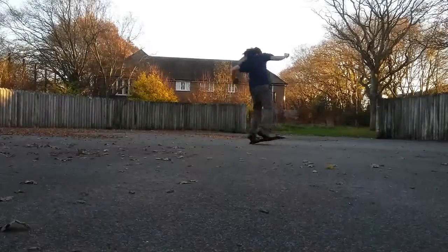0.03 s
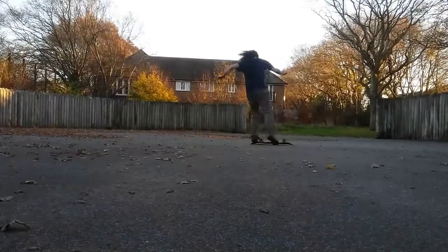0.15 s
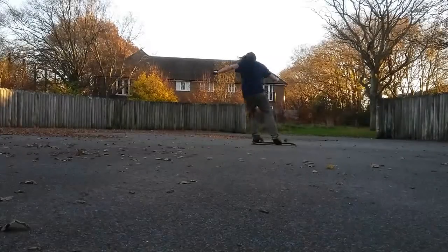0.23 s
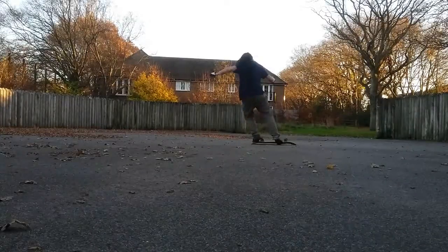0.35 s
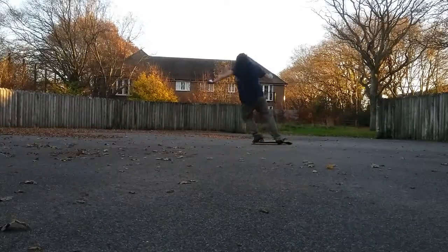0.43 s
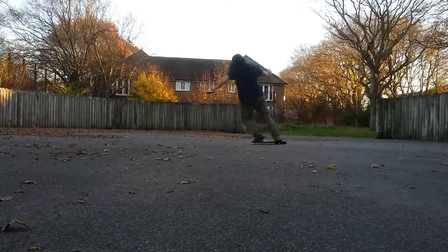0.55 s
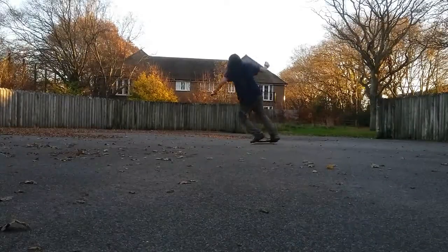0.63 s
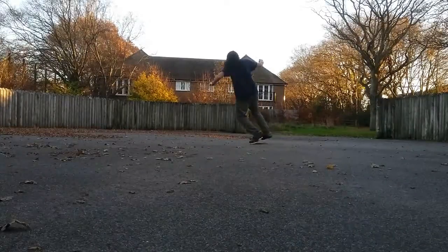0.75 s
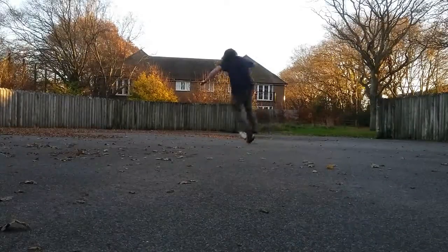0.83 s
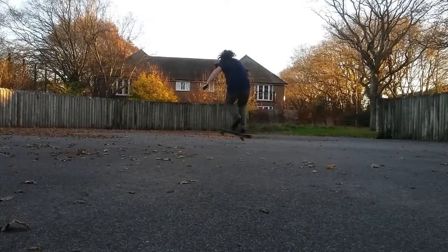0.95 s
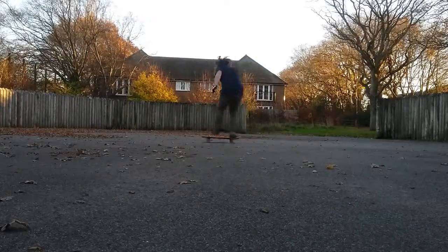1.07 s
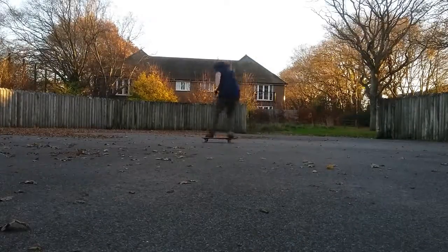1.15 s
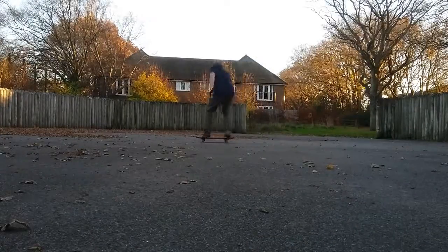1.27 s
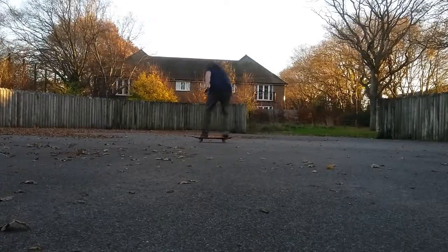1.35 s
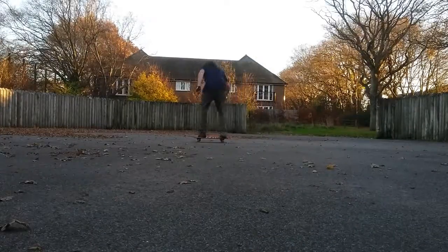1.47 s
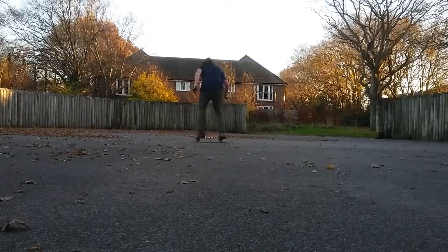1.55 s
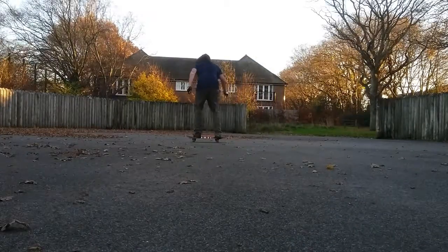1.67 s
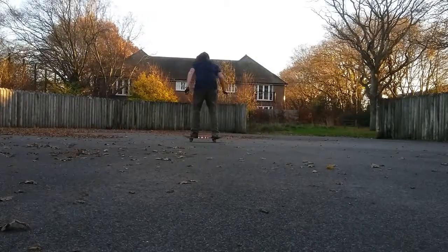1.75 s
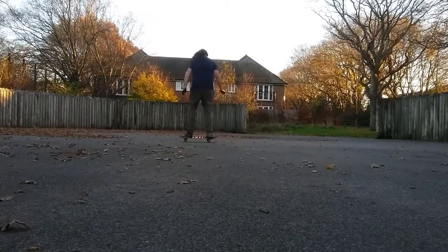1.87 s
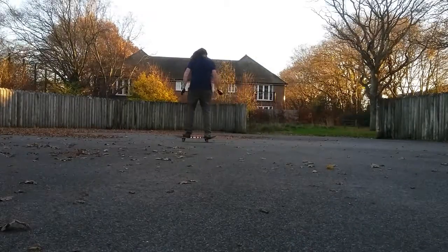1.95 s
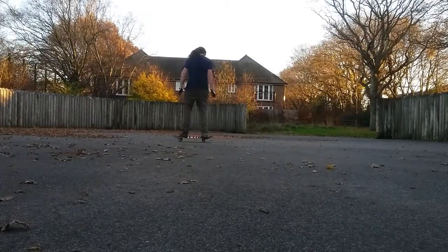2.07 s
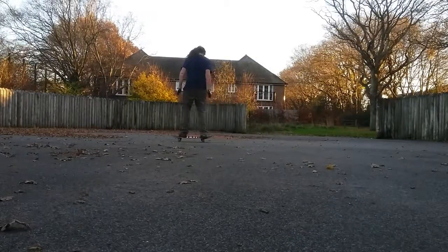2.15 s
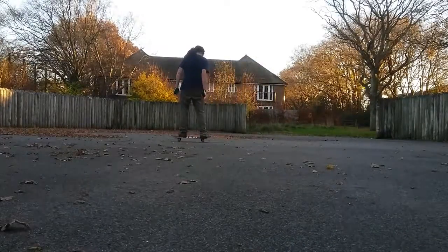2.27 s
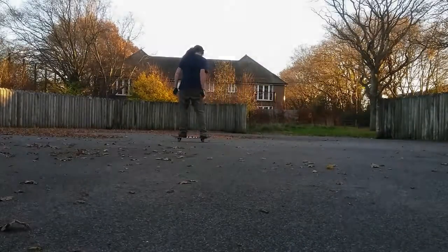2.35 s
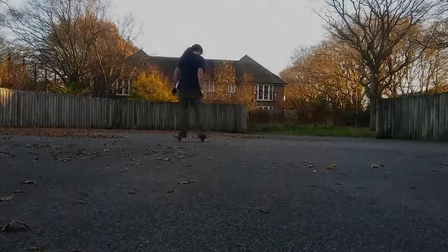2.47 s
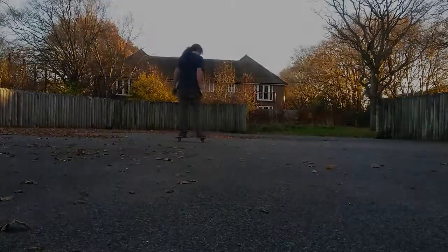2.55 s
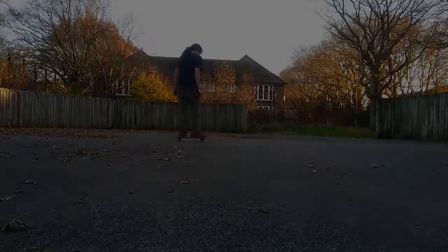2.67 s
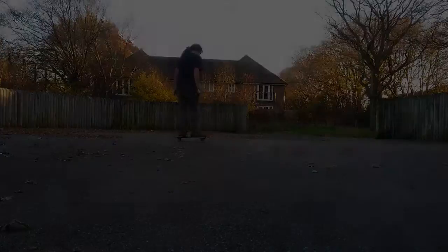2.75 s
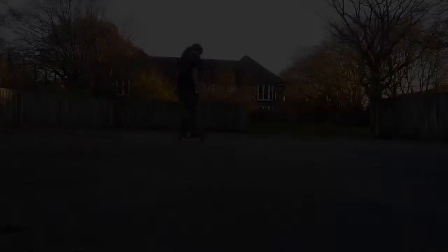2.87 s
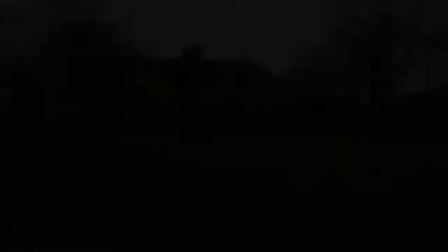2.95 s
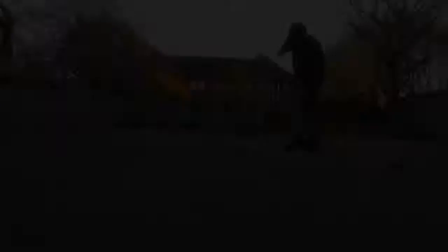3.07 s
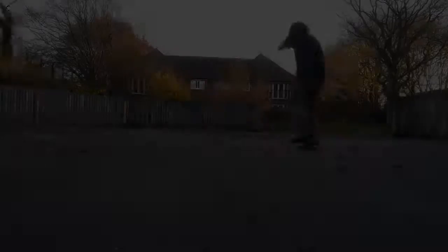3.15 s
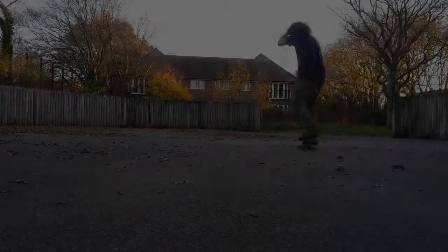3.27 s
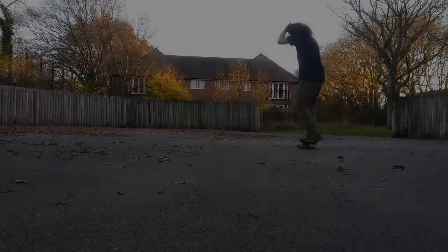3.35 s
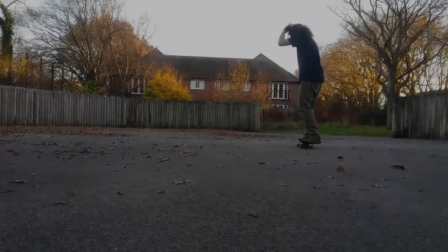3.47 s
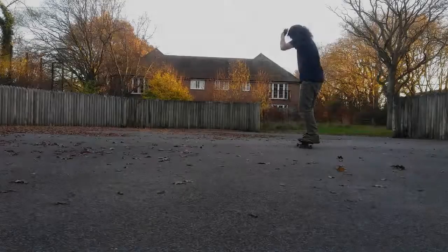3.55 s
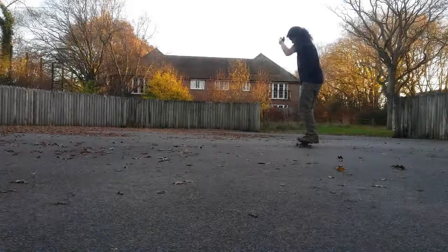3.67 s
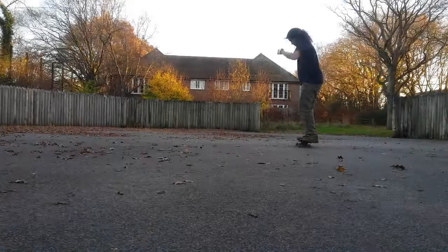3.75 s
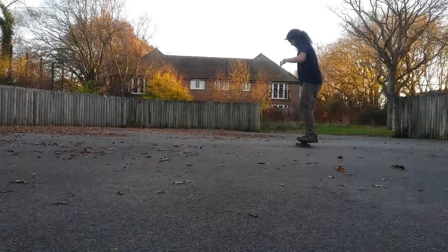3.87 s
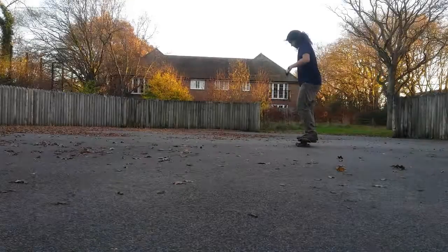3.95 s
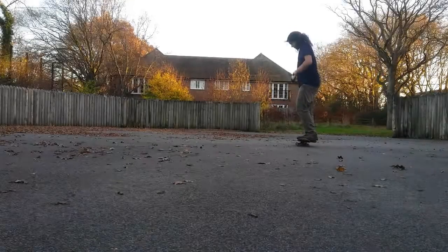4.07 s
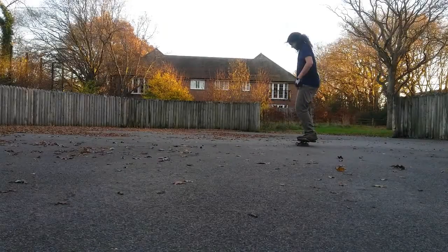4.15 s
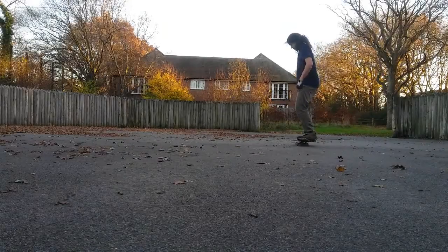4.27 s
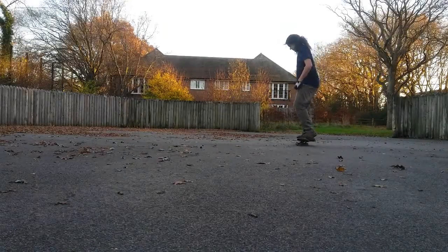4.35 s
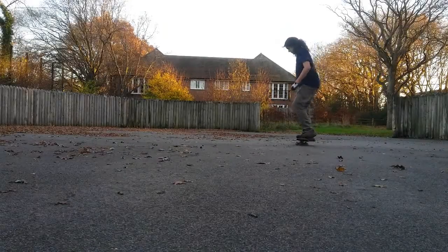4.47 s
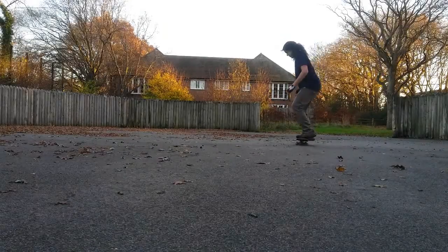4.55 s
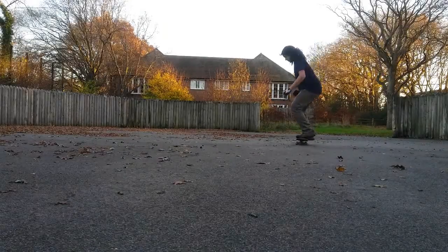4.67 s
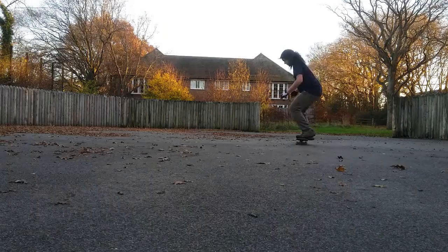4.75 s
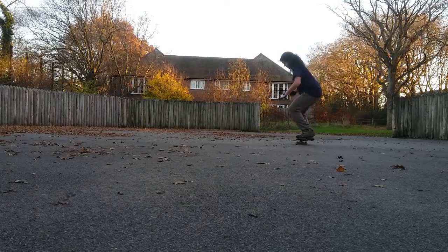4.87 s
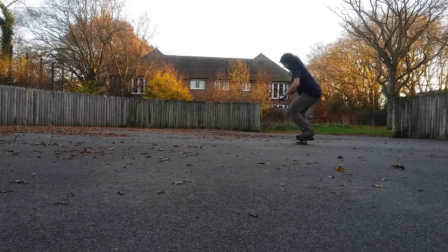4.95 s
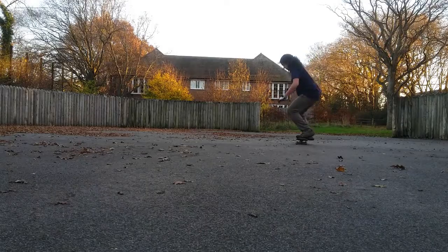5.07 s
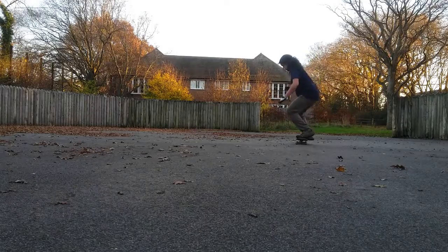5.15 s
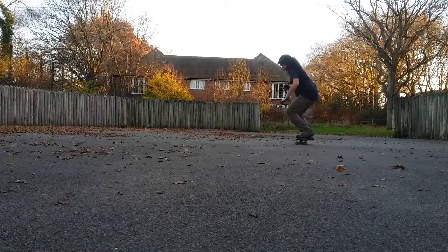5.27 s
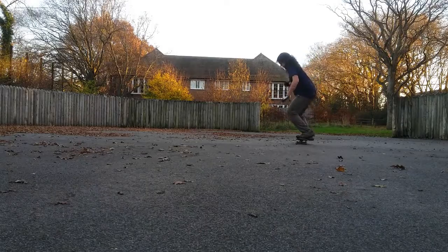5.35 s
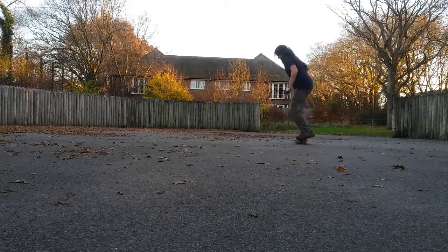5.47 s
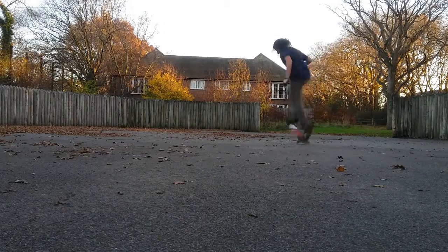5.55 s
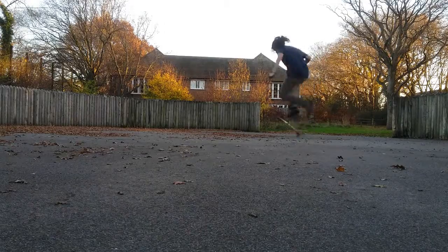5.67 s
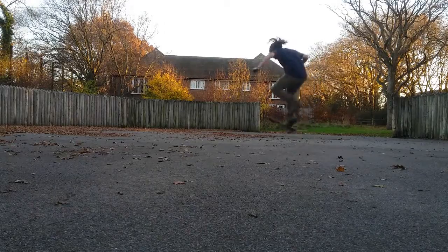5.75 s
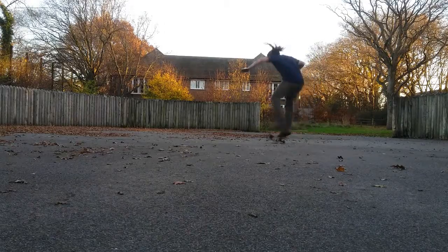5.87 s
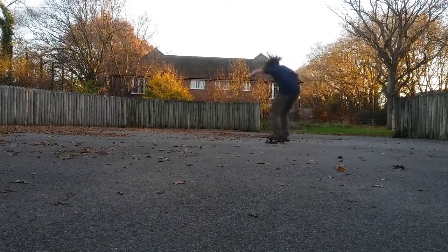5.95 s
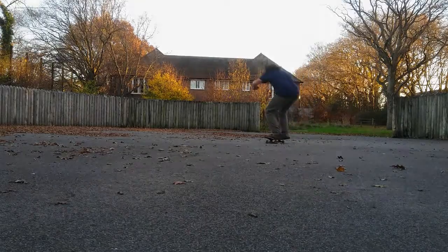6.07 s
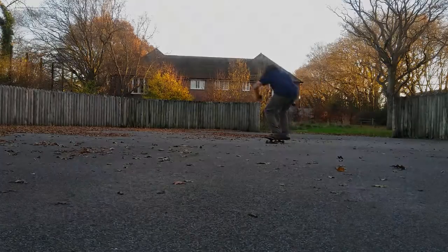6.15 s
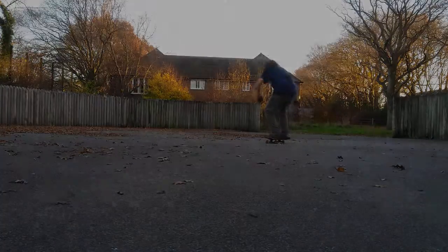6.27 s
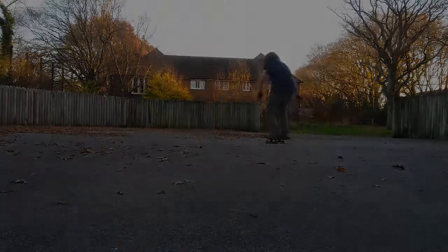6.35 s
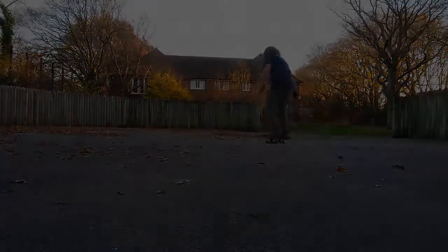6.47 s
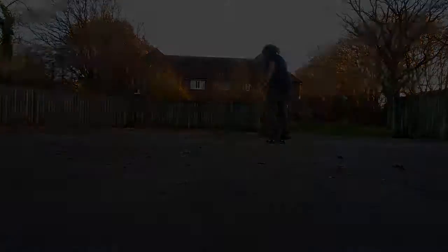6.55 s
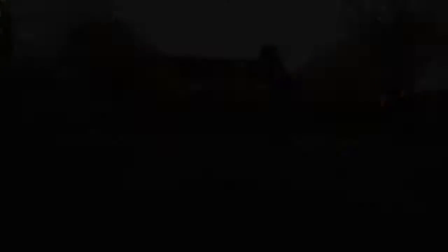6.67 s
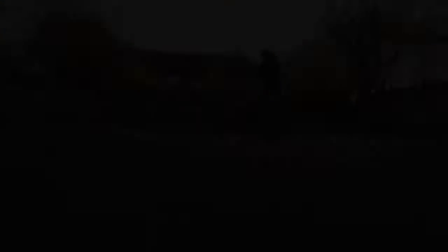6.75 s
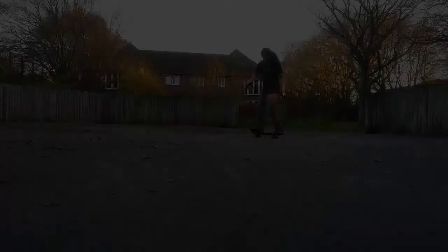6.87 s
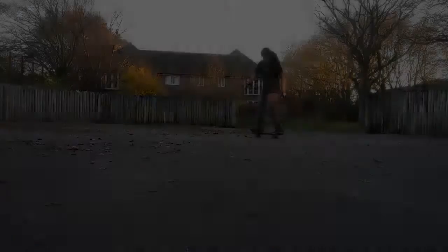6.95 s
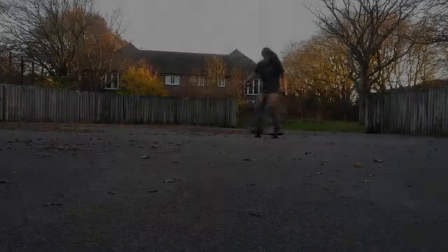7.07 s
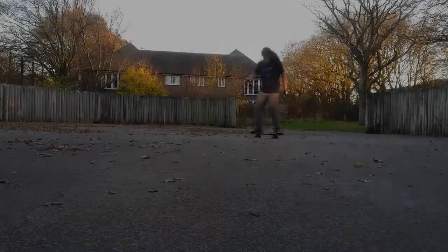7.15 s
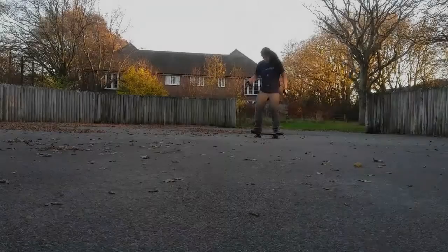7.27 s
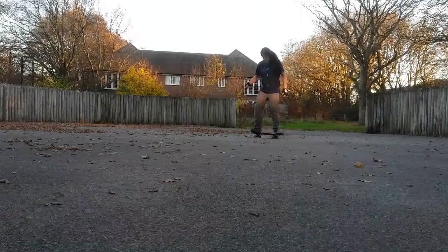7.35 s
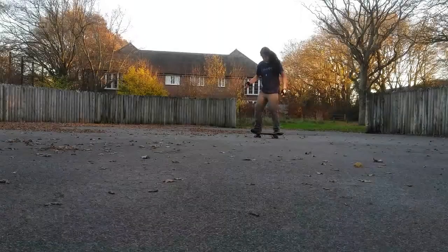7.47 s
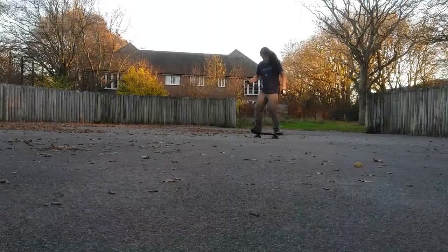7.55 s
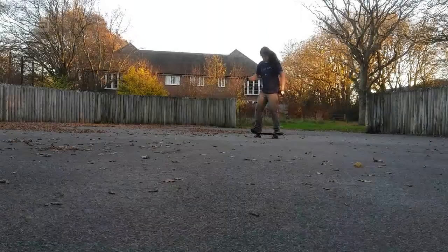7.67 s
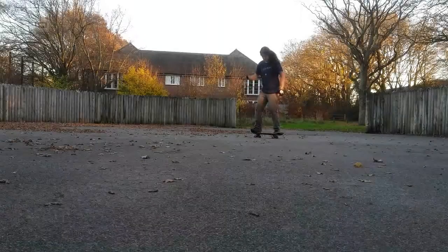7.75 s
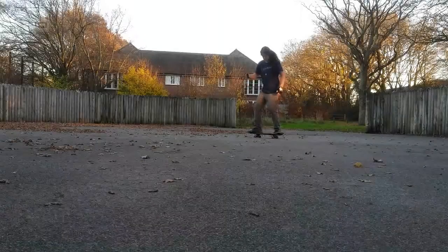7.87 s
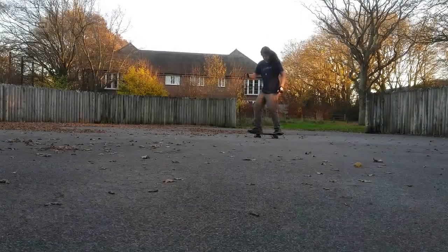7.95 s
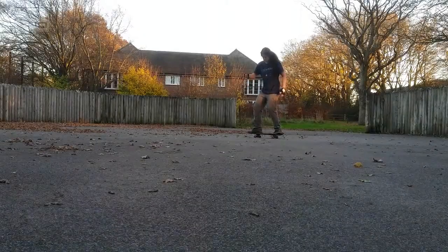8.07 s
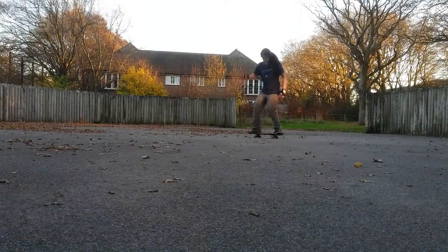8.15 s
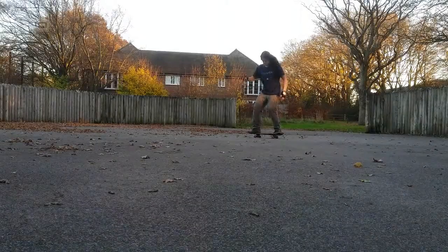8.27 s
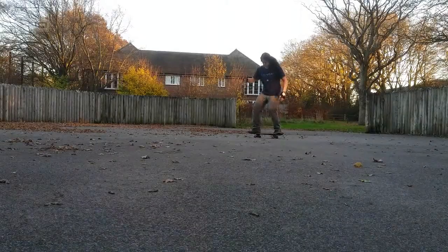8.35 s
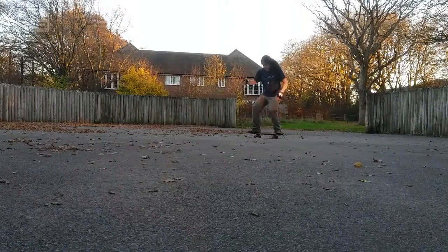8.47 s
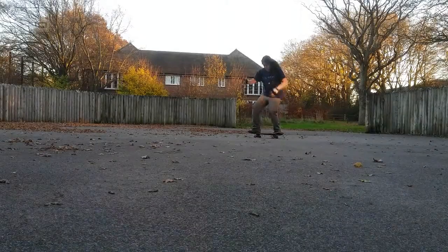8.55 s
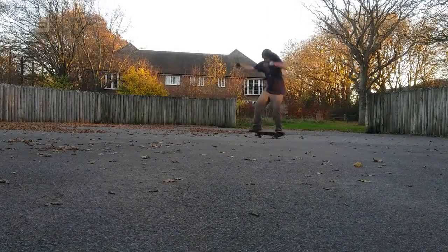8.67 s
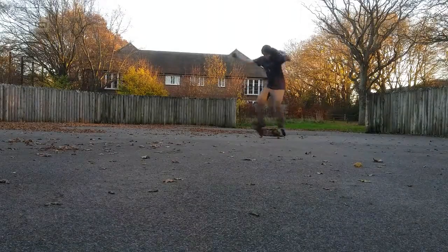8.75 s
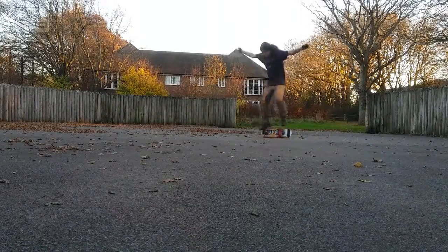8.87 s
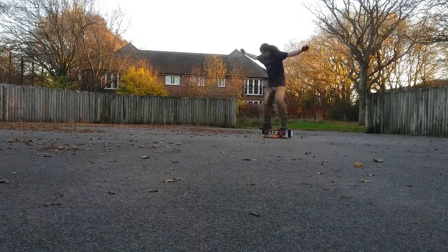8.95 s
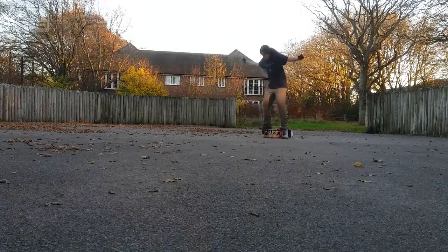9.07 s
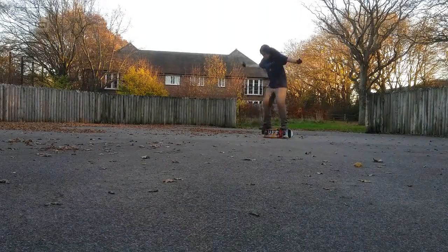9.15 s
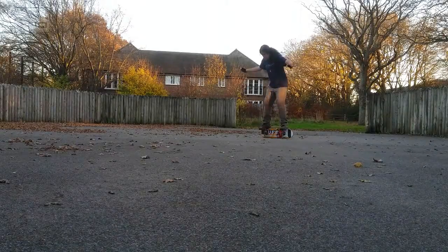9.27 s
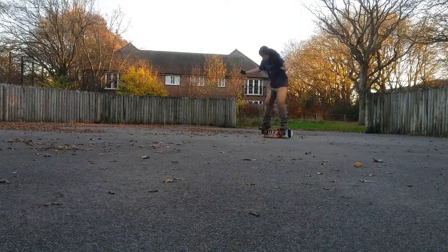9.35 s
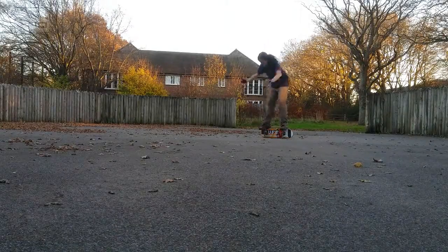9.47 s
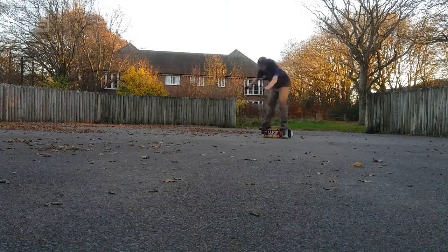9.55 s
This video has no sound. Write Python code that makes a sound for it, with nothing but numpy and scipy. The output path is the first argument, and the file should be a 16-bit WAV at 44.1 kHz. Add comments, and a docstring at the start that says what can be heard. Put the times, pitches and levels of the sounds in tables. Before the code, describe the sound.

Three skateboard tricks in stereo from a low microphone a few metres away. Wheels rumble over a faint low drone; tail and wheels strike in dense clusters of hollow knocks and metallic clacks, with short gritty skids. The middle part has rough swelling rumble, rattle and leaf crackles; the last is quieter, with one distant bird whistle before the slam. Fences and houses return short echoes, and silence separates the parts.

```python
"""Three skateboard tricks on an asphalt yard, heard some metres off at the ground, in three successive scenes.
From the start wheels rumble over a low drone; tail and wheels slam and ring the deck, skid and rattle the trucks.
In the second scene coarse asphalt swells the rumble, loose trucks chatter and dry leaves crackle close by;
in the third a distant bird whistles once, shortly before the last slam. A near wall and far fences answer.
Struck bodies are resonances excited by noise bursts; rolling and skidding are streams of tiny random impacts."""
import sys
import numpy as np
from scipy import signal
from scipy.fft import rfft, irfft, next_fast_len
from scipy.io import wavfile
from scipy.ndimage import map_coordinates

SR = 44100
rng = np.random.default_rng(int(sys.argv[2]) if len(sys.argv) > 2 else 0)


def int16_out(signal):
    """Quantize to a 16-bit WAV file."""
    q = np.round(np.clip(np.atleast_2d(signal).T, -1, 1) * 32767)
    wavfile.write(sys.argv[1], SR, q.astype(np.int16))


N = 424225

# Times of the cuts between the three scenes. Each entry: time in seconds.
CUTS_S = [3.1, 6.83]
FADE_IN_S, FADE_OUT_S = 1.386, .9  # after and before each cut
# Balance of each scene. Each row: thump over knock in dB, crack over clack in dB,
# rattle over rumble in dB, hiss over rumble in dB.
SCENE_BALANCE = [(-12.5, -12.5, -13, -13.5), (-19, -16.5, -12, -14.5), (-20, -21, -21.5, -16)]

# Wheel rumble, set by speed and distance. Each row: time in seconds, level in dB.
ROLL_LEVEL = [(0, -58.5), (0.25, -50), (0.88, -55), (1.15, -49.5), (2.0, -54), (2.3, -61.5), (2.95, -59.5),
              (3.2, -48), (3.95, -54.5), (5.5, -55.5), (6.1, -53), (6.65, -57), (7.1, -57.5), (8.15, -56.5),
              (9.0, -53.5), (9.62, -52)]
# Coarse asphalt swells the rumble. Each row: start in seconds, rise in seconds, gain in dB, decay in seconds.
COARSE_ASPHALT = [(3.36, 0.202, 13, 0.31), (4.06, .14, 11.5, 0.08), (4.531, .08, 12.5, .38)]
RATTLE_GROWS = 1.08  # dB of rattle for each dB of swell
BASS_HZ, BASS_SWELL = 220, 0.4  # the bass of the rumble takes only this share of a swell's dB
# Chatter of the loose trucks. Each row: start in seconds, length in seconds, level in dB.
CHATTER = [(3.56, 0.31, -54), (4.167, 0.17, -48.5), (4.612, 0.16, -54), (4.999, .03, -51),
           (5.515, 0.088, -55)]
CHATTER_ATTACK_S, CHATTER_RELEASE_S = 0.025, 0.01
# Low outdoor drone. Each row: time in seconds, level in dB.
DRONE_LEVEL = [(0, -72), (1.0, -67), (2.0, -66.5), (3.1, -81.5), (5.1, -66), (6.83, -78.5), (7.8, -79.5),
               (9.1, -70)]

# Blows of tail, wheels and feet. Each row: start in seconds, deck knock in dB, knock centre in Hz,
# truck clack in dB, clack centre in Hz, 60 dB decay of the clack's force in seconds.
BLOWS = [(0.0865, -44.5, 590, -37.5, 1650, .03), (0.1115, -36.5, 620, -42.5, 1470, .04),
         (0.1426, -31, 480, -28, 1340, .013), (0.3493, -28, 790, -22.5, 1820, 0.016),
         (0.364, -31, 780, -30, 1470, 0.028), (0.3841, -34.5, 760, -32.5, 1002, 0.036),
         (0.398, -46, 850, -28.5, 955, 0.049), (0.6584, -30.5, 670, -33.5, 1230, 0.043),
         (1.17, -36, 640, -36.5, 1223, .05), (1.2025, -15.5, 700, -21, 1246, .04),
         (1.206, -22.5, 650, -20, 1245, 0.038), (1.2172, -17.5, 470, -21.5, 1680, 0.044),
         (1.229, -19, 540, -25, 1440, .04), (1.2435, -24.5, 422, -37, 1570, .02),
         (1.254, -24.5, 634, -28.5, 2062, 0.042), (1.298, -30, 650, -32.5, 1258, .025),
         (1.3196, -17, 603, -20, 1628, .03), (1.332, -20.5, 400, -28.5, 1730, .03),
         (5.744, -34, 563, -28.5, 1446, 0.042), (5.753, -35, 490, -31, 1720, 0.037),
         (5.842, -45, 456, -38.5, 1680, .02), (6.0487, -28.5, 614, -23, 1150, 0.039),
         (6.0723, -21.5, 434, -24.5, 1180, .03), (6.078, -27.5, 480, -23, 1160, 0.034),
         (6.084, -21.5, 503, -25, 1220, 0.028), (6.1141, -30, 311, -27, 1720, 0.012),
         (8.934, -49, 596, -40.5, 1340, 0.027), (8.95, -46.5, 460, -39.5, 1910, 0.015),
         (8.9945, -30, 440, -28, 1400, 0.047), (9.006, -30, 440, -31.5, 1700, 0.014),
         (9.0208, -17, 580, -20.5, 1420, 0.033), (9.0415, -16.5, 560, -22.5, 1290, .03),
         (9.046, -27, 550, -25, 2672, .03), (9.058, -27, 510, -25, 1190, 0.032),
         (9.1042, -24.5, 600, -29, 1060, 0.033), (9.1256, -19, 470, -30, 1040, .035),
         (9.147, -25.5, 484, -31.5, 2140, .025)]
KNOCK_HZ, THUMP_DB_PER_OCTAVE = 602, 14  # a knock deeper than this bends the deck more
FLEX_T60_S = .027  # bending of the deck
# Skidding wheels and shoes dragged on grip tape. Each row: start in seconds, length in seconds,
# judder at mid-skid in dB, rasp at mid-skid in dB.
SKIDS = [(0.122, 0.13, -36, -49.5), (0.406, 0.057, -31, -48), (0.667, 0.1, -49.5, -54.5),
         (1.037, 0.02, -34, -52.5), (5.724, 0.071, -41, -60), (5.984, 0.024, -47, -71),
         (8.992, .165, -39.5, -55.5)]
SKID_ATTACK_S, SKID_RELEASE_S = 0.02, .012
JUDDER_DB_PER_S, RASP_DB_PER_S = -25, 59.5  # through a skid the judder gives way to a smooth rasp
# Single clicks of trucks and wheels on pebbles. Each row: start in seconds, clack in dB,
# clack centre in Hz, crack in dB.
TICKS = [(0.2192, -36, 2070, -44), (1.748, -57.5, 1560, -68), (1.929, -56.5, 1397, -66),
         (2.655, -60.5, 1940, -66), (3.813, -47, 1596, -64), (4.068, -49.5, 1700, -66),
         (4.163, -44, 1600, -59), (4.288, -47, 1760, -66), (4.403, -42.5, 1740, -63),
         (4.732, -46, 1410, -60), (4.991, -49, 1530, -78), (5.1313, -43.5, 1570, -69),
         (5.235, -46.5, 1690, -74), (5.258, -50, 1500, -76), (5.293, -49, 1680, -79),
         (5.64, -47, 1510, -66), (5.962, -49.5, 1206, -78), (6.642, -54, 1670, -68),
         (6.754, -37.5, 1595, -47.5), (7.985, -41.5, 1560, -62), (8.285, -62, 1300, -66.5),
         (8.836, -44.5, 2900, -64), (9.32, -44.5, 1130, -65)]
# Crackles of dry leaves. Each row: start in seconds, level in dB.
LEAVES = [(3.3707, -52), (3.4154, -49), (3.4554, -52.5), (3.4694, -51.5), (3.5793, -43), (3.6157, -51.5),
          (3.6411, -44.5), (3.6661, -41.5), (4.0193, -60.5), (4.0677, -57.5)]
# Course of the bird's whistle. Each row: time in seconds, pitch in Hz.
BIRD_PITCH = [(8.555, 2940), (8.595, 3010), (8.625, 3200), (8.665, 3210), (8.7, 2990), (8.735, 2760),
              (8.84, 2540)]
BIRD_DB, BIRD_HOLD_S, BIRD_ATTACK_S, BIRD_RELEASE_S = -64.5, .22, .01, .04

# Resonances of the bending deck. Each row: centre in Hz, width in Hz, relative level in dB.
FLEX_MODES = [(100, 90, -11.5), (160, 150, -4), (233, 90, -2)]
# Resonances of the knocked deck. Each row: centre in Hz, width in Hz, relative level in dB.
DECK_MODES = [(314, 170, -1.5), (435, 160, -1.4), (553, 73, -0.63), (745, 110, -1.2)]
# Resonances of the struck trucks. Each row: centre in Hz, width in Hz, relative level in dB.
TRUCK_MODES = [(990, 200, -3), (1150, 110, 1), (1413, 110, -1), (1720, 200, -1.5), (2180, 460, -3.5),
               (2700, 300, -4.5), (3170, 490, -9.5)]
# Resonances of the rattling trucks and bearings. Each row: centre in Hz, width in Hz, relative level in dB.
RATTLE_MODES = [(1213, 200, -4.5), (1576, 130, 0), (1760, 150, 1), (1910, 420, -6.5), (2920, 500, -17.5)]
# Resonances of the juddering board. Each row: centre in Hz, width in Hz, relative level in dB.
JUDDER_MODES = [(330, 110, -10.5), (560, 70, -4.5), (950, 160, -1.5), (1420, 120, -2), (1680, 230, -5.5),
                (2170, 320, -5.5), (3030, 250, -17)]

# Spectrum of crushed grit. Each row: frequency in Hz, relative density in dB per Hz.
CRACK_SPECTRUM = [(2000, -39.5), (3300, 5), (4200, -0.5), (5500, -2), (7200, -9), (9300, -26),
                  (15500, -26.5)]
# Spectrum of the wheel rumble. Each row: frequency in Hz, relative density in dB per Hz.
WHEEL_SPECTRUM = [(25, -32.5), (55, -12), (90, 0.5), (160, -1), (300, -3), (600, -8), (900, -7.5),
                  (1300, -17), (2500, -39.5), (6000, -70)]
# Spectrum of the hiss under the tread. Each row: frequency in Hz, relative density in dB per Hz.
GRIT_SPECTRUM = [(900, -21), (2000, 5.5), (2800, 4.5), (4200, -2.5), (6000, -1.5), (7600, -8), (9500, -19),
                 (13000, -14), (15500, -14.5)]
# Spectrum of a leaf crackle. Each row: frequency in Hz, relative density in dB per Hz.
LEAF_SPECTRUM = [(2000, -28), (3500, 5), (5000, 1.5), (7000, 3), (9000, -9), (12000, -13), (15500, -12)]
# Spectrum of the drone. Each row: frequency in Hz, relative density in dB per Hz.
AIR_SPECTRUM = [(15, -16), (30, -11), (48, 1.5), (70, -9.5), (150, -39.5), (400, -84.5)]
# Colour of the echo from fences and houses. Each row: frequency in Hz, gain in dB.
FENCE_COLOUR = [(80, -14), (200, -9.5), (400, 8.5), (700, 3), (1100, -8.5), (2500, -7.5), (6000, -8),
                (15000, -16)]
# Decay of the yard's tail. Each row: frequency in Hz, 60 dB decay in seconds.
YARD_T60 = [(150, 0.78), (600, 0.89), (2000, .6), (6000, 0.84), (14000, 0.35)]
# Likeness of left and right in the grain streams. Each row: frequency in Hz, correlation from -1 to 1.
LIKENESS = [(30, 0.63), (120, .94), (300, .9), (640, 0.63), (1400, 0.031), (3100, 0.34), (6800, 0.92),
            (15000, -0.091)]
# Phase between the microphone ports. Each row: frequency in Hz, lead of the right in radians.
PORT_PHASE = [(100, 0.024), (1100, .3), (3500, 1.2), (5200, 1.8), (6500, 2.2), (15000, 2.2)]
# Level between the microphone ports. Each row: frequency in Hz, left minus right in dB.
PORT_TILT = [(100, 0.7), (700, -0.5), (1300, -0.5), (2400, -1), (4400, 4), (8000, -4), (15000, -1)]
TOP_HZ = 15900  # band limit of the microphones


def amp(db):
    """Level: decibels become a gain, 20 dB to a factor of ten."""
    return 10 ** (np.asarray(db) / 20)


def unit(x):
    """Normalisation: a signal is scaled to rms 1."""
    return x / np.sqrt(np.mean(x ** 2) + 1e-20)


def along(points, hz):
    """Interpolation: (Hz, value) points are read on a logarithmic frequency axis."""
    f, v = np.transpose(points)
    return np.interp(np.log(hz + 1), np.log(f), v)


def curves(rows):
    """Interpolation in time: each column after the first gives one value per sample."""
    s, *cols = np.transpose(rows)
    return [np.interp(np.arange(N) / SR, s, c) for c in cols]


def wobble(rate):
    """Smooth random fluctuation: a spline through random knots, rate a second."""
    knots = rng.standard_normal(int(N * rate / SR) + 4)
    return map_coordinates(knots, [np.arange(N) * rate / SR])


def filtered(x, response):
    """Linear filtering: the spectrum of x is multiplied by a complex response."""
    n = x.shape[-1]
    m = next_fast_len(n + SR // 10)
    hz = np.fft.rfftfreq(m, 1 / SR)
    return irfft(rfft(x, m) * response(hz), m)[..., :n]


def colour(points):
    """Spectral shaping: a table in dB becomes a response."""
    return lambda hz: amp(along(points, hz))


def body(modes, vary_db=0, centre_hz=1000, focus_db=0):
    """Modal resonance: the contact point favours modes near centre_hz, by focus_db per octave."""
    hz, width, db = np.transpose(modes)
    varied_db = db + vary_db * rng.standard_normal(len(hz))
    octaves_off = np.abs(np.log2(hz / centre_hz))
    signs = (-1) ** np.arange(len(hz))
    gains = signs * amp(varied_db - focus_db * octaves_off)

    def response(f):
        """Radiation: the modes add, with little sound below the lowest or above the highest."""
        ring = sum(g * 1j * f * w / (c * c - f * f + 1j * f * w) for g, c, w in zip(gains, hz, width))
        low, high = 1j * f / (.75 * hz.min()), 1j * f / (1.4 * hz.max())
        highpassed = ring * low ** 2 / (1 + low + low ** 2)
        return highpassed / (1 + high + high ** 2)
    return response


def add(track, s, sound):
    """Superposition: a sound joins a track at time s."""
    part = track[..., round(s * SR):][..., :sound.shape[-1]]
    part += sound[..., :part.shape[-1]]


def stroke(start, length, attack, release):
    """Envelope: the gain rises to 1 at start, holds for length and dies exponentially."""
    t = np.arange(N) / SR - start
    return np.exp(-(np.minimum(t, 0) / attack) ** 2 - np.maximum(t - length, 0) / release)


def contact(response, t60, rise=.0005, snap=4):
    """Impact excitation: a sharp strike and a short noisy crush ring a body, at a set early energy."""
    t = np.arange(SR // 6) / SR
    force = rng.standard_normal(len(t)) * amp(-60 * t / t60) * (1 - np.exp(-t / rise))
    force[SR // 1000] += snap
    ring = filtered(force, response)
    # the energy of the first 20 ms equals that of 12 ms at rms 1
    return ring / np.sqrt(np.sum(ring[t < .02] ** 2) / (.012 * SR))


def spray(t60):
    """Incoherent radiation: crushed grit sprays treble that differs from left to right."""
    return np.array([contact(colour(CRACK_SPECTRUM), t60, rise=.0015, snap=1) for _ in range(2)])


def grains(response, rate, spread_db):
    """Shot noise: tiny random impacts, rate a second, pass through a body in stereo; rms 1."""
    hits = rng.random((2, N)) < rate / SR
    kicks = hits * rng.standard_normal((2, N)) * amp(spread_db * rng.standard_normal((2, N)))

    def mid_side(hz):
        turn = np.arccos(np.clip(along(LIKENESS, hz), -1, 1)) / 2
        return response(hz) * np.array([np.cos(turn), np.sin(turn)])
    mid, side = filtered(kicks, mid_side)
    return unit(np.array([mid + side, mid - side]))


def balance(s):
    """Scene balance: the columns of SCENE_BALANCE at time s."""
    return np.array(SCENE_BALANCE)[np.searchsorted(CUTS_S, s)].T


def rolling():
    """Roughness excitation: grains drum wheels and deck, shake the trucks in clumps, hiss under the tread."""
    t = np.arange(N) / SR
    rattle_db, hiss_db = balance(t)[2:4]
    roll_db, = curves(ROLL_LEVEL)
    swell_db = np.zeros(N)
    for s, rise, db, decay in COARSE_ASPHALT:
        growth = np.clip((t - s) / rise, 0, 1)
        swell_db += db * growth * np.exp(-np.maximum(t - s - rise, 0) / decay)
    chatter = sum(amp(db) * stroke(s, length, CHATTER_ATTACK_S, CHATTER_RELEASE_S)
                  for s, length, db in CHATTER)
    shake = np.hypot(amp(roll_db + rattle_db + RATTLE_GROWS * swell_db), chatter)
    bumps = wobble(30)

    drumming = grains(colour(WHEEL_SPECTRUM), rate=7000, spread_db=0.5)
    bass = filtered(drumming, lambda hz: 1 / (1 + (hz / BASS_HZ) ** 4))
    swelled = amp(BASS_SWELL * swell_db) * bass + amp(swell_db) * (drumming - bass)
    rumble = amp(roll_db + bumps) * swelled

    clumps = amp(1.8 * bumps + 2.2 * wobble(110))
    rattle = shake * clumps * grains(body(RATTLE_MODES), rate=1500, spread_db=2.5)

    hiss_gain = amp(roll_db + swell_db + hiss_db + 0.73 * bumps)
    hiss = hiss_gain * grains(colour(GRIT_SPECTRUM), rate=11000, spread_db=2.0)
    return rumble + rattle + hiss


def near_wall(x, delay=.013, wall_db=-6, dull_hz=700):
    """Comb filtering: one dull reflection, delay in seconds, ripples the bass."""
    def response(hz):
        reflection = amp(wall_db) * np.exp(-2j * np.pi * hz * delay)
        return 1 + reflection / (1 + (hz / dull_hz) ** 2)
    return filtered(x, response)


def drone():
    """Broadband noise: far traffic and moving air merge into a low drone."""
    return amp(curves(DRONE_LEVEL)[0]) * grains(colour(AIR_SPECTRUM), rate=15000, spread_db=1.0)


def blows():
    """Modal impact: a blow knocks wood and clacks trucks; deep knocks flex the deck, hard clacks crack grit."""
    track = np.zeros((2, N))
    for s, knock, knock_hz, clack, clack_hz, t60 in BLOWS:
        thump_db, crack_db = balance(s)[:2]
        thump = knock + thump_db - THUMP_DB_PER_OCTAVE * np.log2(knock_hz / KNOCK_HZ)
        flex = body(FLEX_MODES, vary_db=4.0)
        deck = body(DECK_MODES, 2, knock_hz, focus_db=11)
        trucks = body(TRUCK_MODES, 2, clack_hz, focus_db=7)
        sound = amp(thump) * contact(flex, FLEX_T60_S, snap=5.5)
        sound += amp(knock) * contact(deck, .8 * t60, snap=6)
        sound += amp(clack) * contact(trucks, t60, snap=4)
        add(track, s, sound + amp(clack + crack_db) * spray(1.4 * t60))
    return track


def yard(x, early_db=-7.5, tail_db=-14, fence_db=-17, early_t60=.1, fence_s=.15, fence_spread=0.044,
         lumps_db=6.0, slap_s=.11, slap=1.4):
    """Outdoor reverberation: quick ground scatter, a fading tail, a late lumpy swell off fences and houses."""
    t = np.arange(SR * 3 // 4) / SR

    def noise():
        return rng.standard_normal((2, len(t)))

    def unit_energy(h):
        return unit(h) / np.sqrt(len(t))

    def hump(s, spread):
        return np.exp(-((t - s) / spread) ** 2 / 2)

    hz, frames, z = signal.stft(noise(), SR, nperseg=256)
    decay = amp(-60 * frames / along(YARD_T60, hz)[:, None])
    tail = signal.istft(z * decay, SR, nperseg=256)[1][:, :len(t)]
    tail = tail * (1 - np.exp(-t / 0.023))
    early = noise() * amp(-60 * t / early_t60) * (1 - np.exp(-t / 0.0071))
    swell = hump(fence_s, fence_spread) + slap * hump(slap_s, 0.017)
    swell = swell * amp(lumps_db * wobble(90)[:len(t)])
    fence = filtered(unit_energy(noise() * swell), colour(FENCE_COLOUR))
    answer = amp(early_db) * unit_energy(early) + amp(tail_db) * unit_energy(tail) + amp(fence_db) * fence

    def mid_side(f):
        # close-set microphones hear long waves alike
        apart = np.pi / 4 * f / np.hypot(f, 300)
        return np.array([np.cos(apart), np.sin(apart)])
    mid, side = filtered(answer, mid_side)
    return signal.fftconvolve(x[None], np.array([mid + side, mid - side]), axes=1)[:, :N]


def skids():
    """Stick-slip friction: urethane grips and slips on stones in quick uneven judders that ring the board."""
    judder, rasp = np.zeros((2, N))
    for s, length, judder_db, rasp_db in SKIDS:
        slide = stroke(s, length, SKID_ATTACK_S, SKID_RELEASE_S)
        from_middle = np.clip(np.arange(N) / SR - s, 0, length) - length / 2
        judder += slide * amp(judder_db + JUDDER_DB_PER_S * from_middle)
        rasp += slide * amp(rasp_db + RASP_DB_PER_S * from_middle)
    slips = unit(amp(2.2 * wobble(140)))
    juddering = judder * grains(body(JUDDER_MODES), rate=900, spread_db=2)
    rasping = rasp * grains(colour(CRACK_SPECTRUM), rate=6800, spread_db=0.0)
    return slips * (juddering + rasping)


def ticks(knock_db=-8):
    """Light impact: small contacts ring the trucks and bearings, and the deck more faintly."""
    track = np.zeros((2, N))
    for s, clack, clack_hz, crack in TICKS:
        trucks = body(RATTLE_MODES, 2, clack_hz, focus_db=5)
        add(track, s, amp(clack) * contact(trucks, t60=.02))
        add(track, s, amp(clack + knock_db) * contact(body(DECK_MODES, vary_db=3), t60=0.024))
        add(track, s, amp(crack) * spray(t60=.03))
    return track


def fades(shape=0.93):
    """Amplitude envelope: the sound fades to silence at each cut and rises again."""
    t = np.arange(N) / SR
    gain = np.ones(N)
    for cut in CUTS_S:
        ramp = np.maximum((cut - t) / FADE_OUT_S, (t - cut) / FADE_IN_S)
        gain *= np.minimum(ramp, 1) ** shape
    return gain


def leaves(left_db=2.0):
    """Brittle crackling: short crisp noise bursts close by, raised on the left and lowered on the right."""
    track = np.zeros(N)
    for s, db in LEAVES:
        add(track, s, amp(db) * contact(colour(LEAF_SPECTRUM), t60=.035, rise=0.0011))
    return track * amp([[left_db], [-left_db]])


def bird():
    """Frequency modulation: one thin, slightly hoarse whistle arches in pitch and falls away."""
    pitch_hz, = curves(BIRD_PITCH)
    hoarse_hz = pitch_hz * (1 + .008 * wobble(280))
    phase = 2 * np.pi * np.cumsum(hoarse_hz) / SR
    envelope = stroke(BIRD_PITCH[0][0], BIRD_HOLD_S, BIRD_ATTACK_S, BIRD_RELEASE_S)
    return amp(BIRD_DB + 1.4 * wobble(70)) * np.sin(phase) * envelope


def scene():
    """Superposition: each scene has its own echo, which ends with it; the far bird is mostly echo."""
    board = blows() + ticks() + skids()
    whistle = bird()
    source = board.mean(axis=0) + 4 * whistle
    which = np.searchsorted(CUTS_S, np.arange(N) / SR)
    echo = np.zeros((2, N))
    for k in range(len(SCENE_BALANCE)):
        within = which == k
        echo += yard(source * within) * within
    walled = near_wall(board + echo + rolling())
    return fades() * (walled + whistle + leaves() + drone())


def record(dry):
    """Stereo reception: two microphone ports differ in level and phase, and pass nothing above TOP_HZ."""
    half = np.array([[.5], [-.5]])

    def response(hz):
        tilt = amp(half * along(PORT_TILT, hz))
        return tilt * np.exp(-1j * half * along(PORT_PHASE, hz))
    ports = filtered(dry, response)
    return filtered(ports, lambda hz: hz < TOP_HZ)


dry = scene()
out = record(dry)
int16_out(out)
```